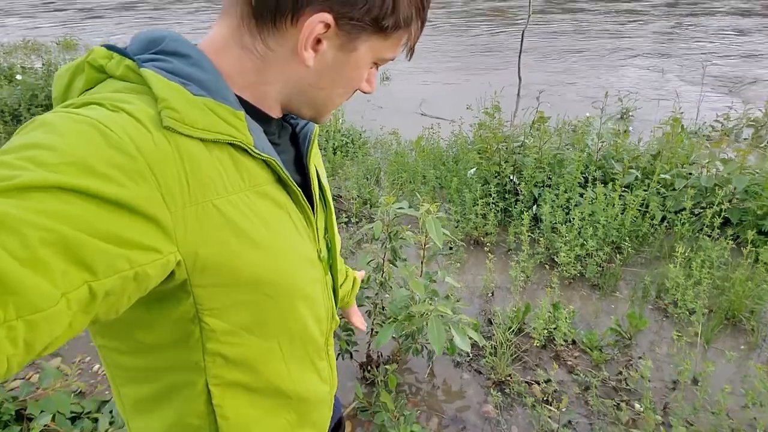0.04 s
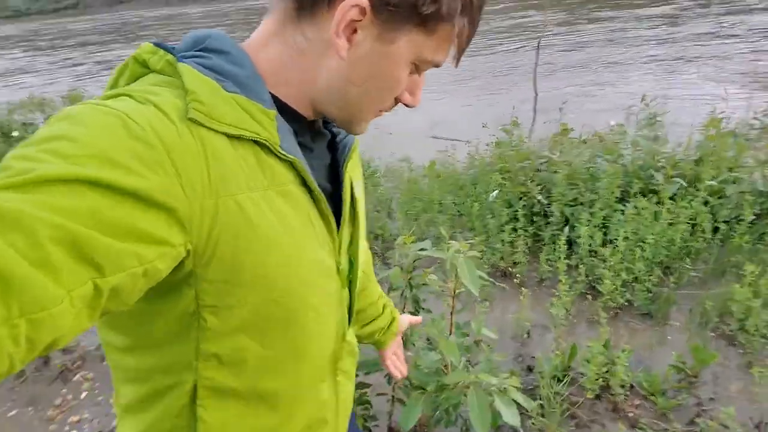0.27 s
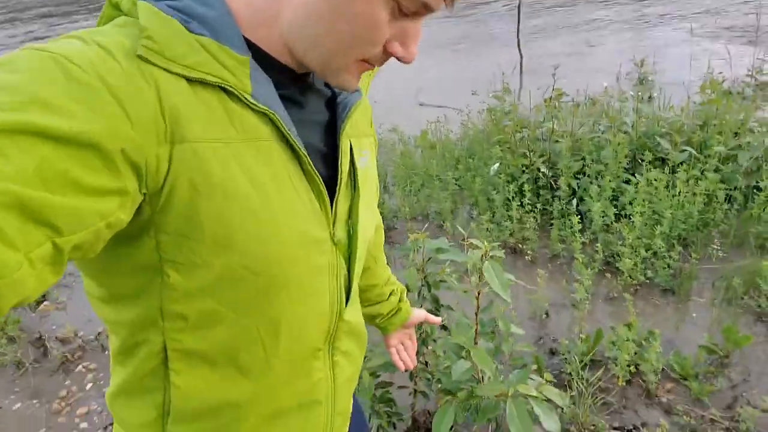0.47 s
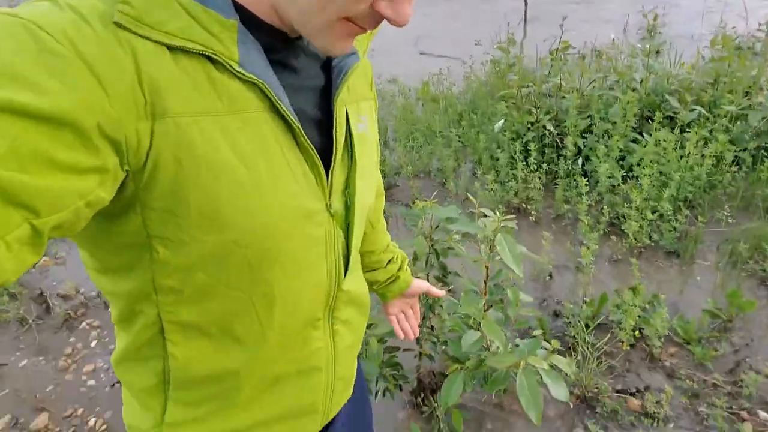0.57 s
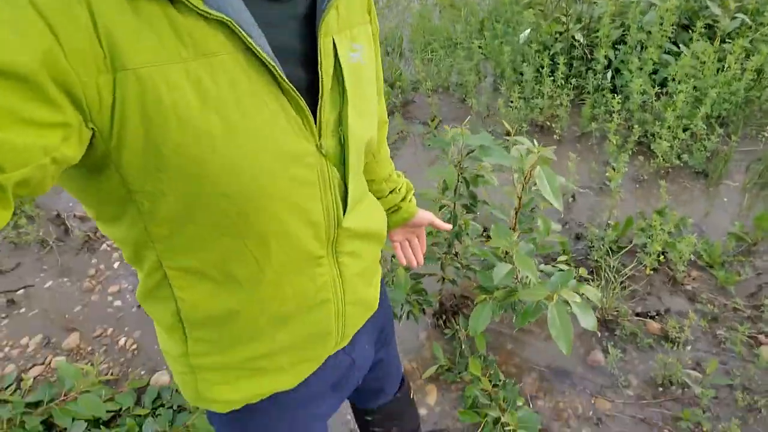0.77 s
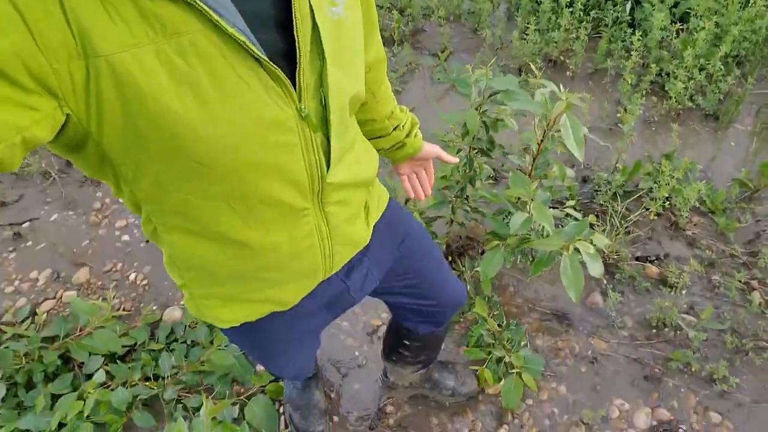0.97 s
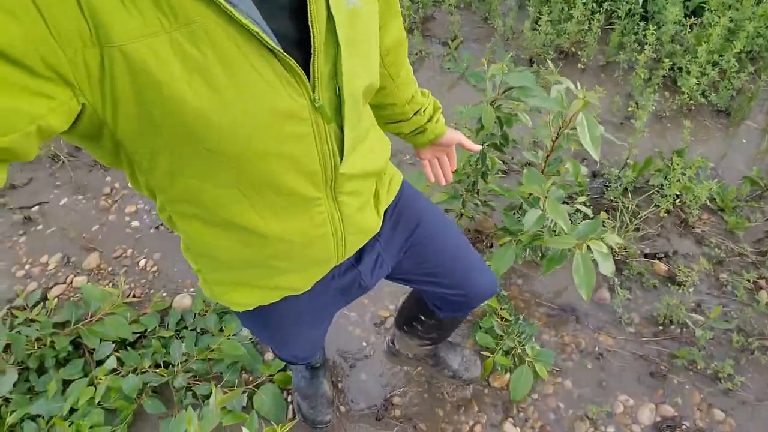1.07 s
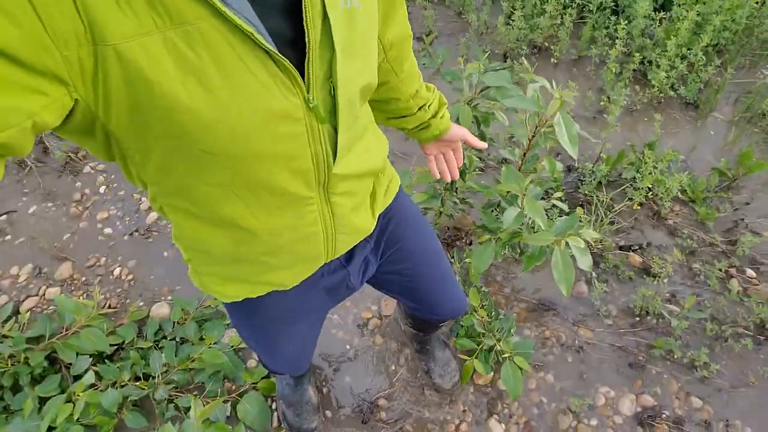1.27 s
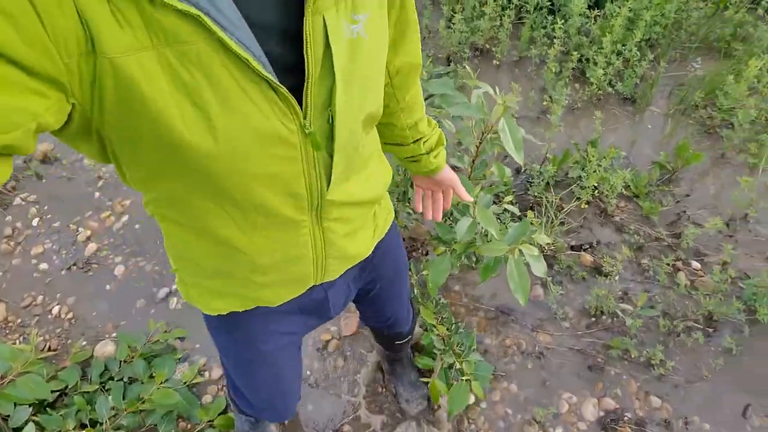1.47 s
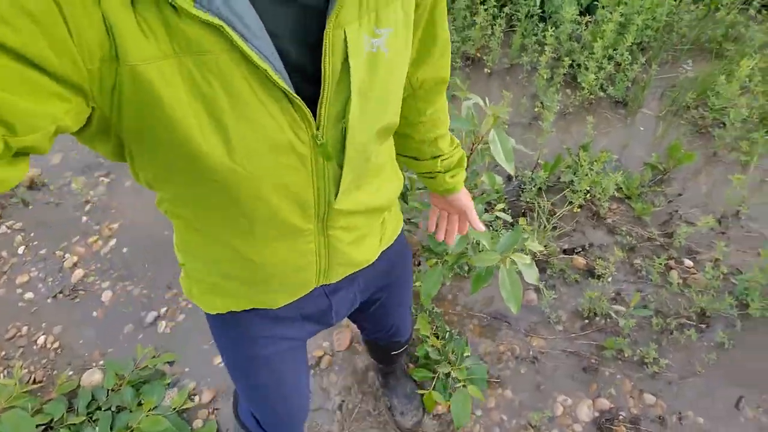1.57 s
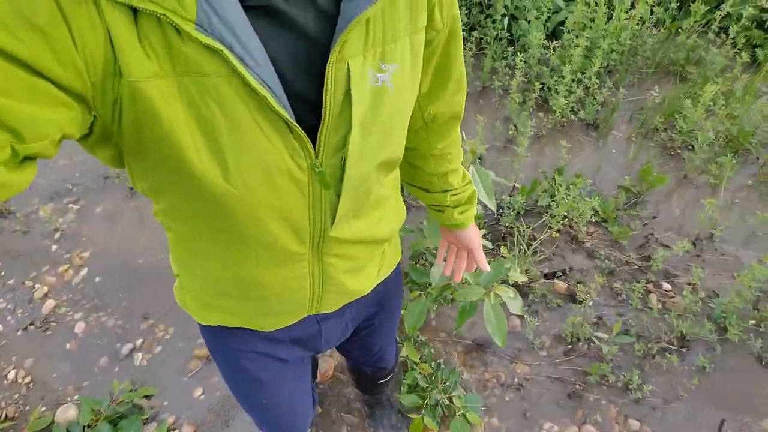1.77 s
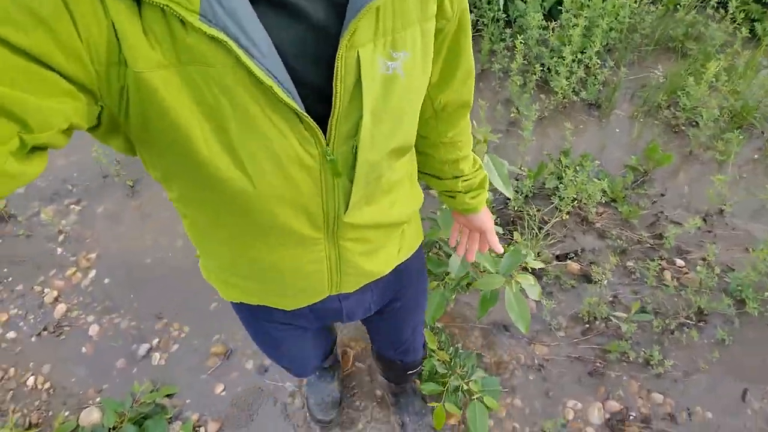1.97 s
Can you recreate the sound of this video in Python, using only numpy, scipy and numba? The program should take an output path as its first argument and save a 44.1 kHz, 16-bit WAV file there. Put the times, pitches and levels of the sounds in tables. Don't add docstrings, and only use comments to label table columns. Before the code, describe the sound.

Rubber boots squelch through wet riverbank mud, with sucking pops, bubbles and low wind rumble

```python
import sys
import numpy as np
from scipy import signal
from scipy.fft import rfft, irfft, next_fast_len
from scipy.io import wavfile
from scipy.ndimage import uniform_filter1d
from numba import njit

SR = 44100
rng = np.random.default_rng(int(sys.argv[2]) if len(sys.argv) > 2 else 0)


def voltage_ratio(decibels):
    exponent = np.asarray(decibels, float) / 20
    return 10 ** exponent


def dump(signal):
    limited = np.clip(np.atleast_2d(signal).T, -1, 1)
    pcm = np.round(limited * 32767).astype(np.int16)
    wavfile.write(sys.argv[1], SR, pcm)


N = 89655
T = np.arange(N) / SR
FFT_SIZE = next_fast_len(N)
HZ = np.fft.rfftfreq(FFT_SIZE, 1 / SR)


def unit(x):
    return x / np.sqrt(np.mean(x ** 2))


def gain_at(table, hz):
    f, db = np.array(table, float).T
    return voltage_ratio(np.interp(np.log(hz + 1), np.log(f), db, left=-70, right=-70))


def noise(table):
    spectrum = rfft(rng.standard_normal(N), FFT_SIZE) * gain_at(table, HZ)
    return unit(irfft(spectrum, FFT_SIZE)[:N])


def walk(rate_hz):
    k = int(SR / rate_hz)
    steps = np.repeat(rng.standard_normal(N // k + 1), k)
    return unit(uniform_filter1d(uniform_filter1d(steps, k), k)[:N])


@njit
def rings(n, start, turn, t60, glide, size, swell):
    y = np.zeros(n)
    for k in range(len(start)):
        first = int(start[k]) + 1
        last = min(n, first + int(.7 * t60[k]) + 1)
        fall = np.exp(-np.log(1000.) / t60[k])
        bend = np.exp(1j * turn[k] * glide[k])
        z = size[k] * np.exp(1j * turn[k] * (first - start[k]))
        step = fall * np.exp(1j * turn[k])
        rest = 1.
        keep = np.exp(-turn[k] / (6.3 * swell))
        for i in range(first, last):
            rest *= keep
            y[i] += z.imag * (1 - rest)
            z *= step
            step *= bend
    return y


def ring(s, hz, t60, glide, size, swell):
    turn = 2 * np.pi * np.minimum(hz, .4 * SR) / SR
    return rings(N, s * SR, turn, t60 * SR, glide / SR + 0 * s, size, swell)


def cluster(s, db, hz, late_s, spread, count):
    u = rng.standard_normal((len(s), count, 2))
    u[:, 0] = 0
    u[:, 1:, 1] = .3 * u[:, 1:, 1] + np.array([-1, 1, .5])
    times = s[:, None] + late_s * np.abs(u[..., 0])
    pitches = hz[:, None] * np.exp(spread * np.tanh(u[..., 1]))
    sizes = np.repeat(voltage_ratio(db), count) * np.tile(0.75 ** np.arange(count), len(s))
    return times.ravel(), pitches.ravel(), sizes


def surge(s, rise_s, fall_s):
    age = np.maximum(T - s, 0)
    return np.minimum(age / rise_s, 1) * voltage_ratio(-60 * np.maximum(age - rise_s, 0) / fall_s)


def pockets(table, count, cycles=9.1):
    when, where, strength, kind = rng.random((count, 4)).T
    lo, hi = np.sqrt(table[0][0]), np.sqrt(table[-1][0])
    hz = (lo + (hi - lo) * where) ** 2
    size = gain_at(table, hz) * hz ** 0.58
    size = size * voltage_ratio(-4.5 * np.log(1.02 - strength)) * np.sign(kind - .5)
    t60 = cycles * (.5 + 2 * np.abs(kind - .5)) / hz
    swarm = ring(when * N / SR, hz, t60, hz / 100, size, swell=0.49)
    return unit(swarm) + voltage_ratio(-8) * noise(table)


def ports(left, right):
    # f/Hz, left over right level/dB, left leads by phase/rad
    port_table = [(300, -1, 0), (1420, -5, 0.27), (1910, -9.5, 1.08), (3730, -6.5, 1.45), (4250, 0.5, 5),
                  (5300, 0, 7), (5830, 5.5, 6.5), (8670, 10.5, 11.5), (13200, 2.5, 10.5)]
    f, db, lead = np.array(port_table, float).T
    half = voltage_ratio(np.interp(HZ, f, db) / 2) * np.exp(.5j * np.interp(HZ, f, lead))
    left_out = irfft(rfft(left, FFT_SIZE) * half, FFT_SIZE)[:N]
    right_out = irfft(rfft(right, FFT_SIZE) / half, FFT_SIZE)[:N]
    return np.array([left_out, right_out])


def river():
    # f/Hz, level/dB per Hz
    hiss = [(100, -26), (200, -3.5), (640, -4.5), (1400, -7), (3400, -7.5), (4500, -19), (7340, -27.5),
            (16000, -28.5)]
    mid, left, right = (noise(hiss) for _ in range(3))
    return voltage_ratio(-68 + walk(5.4)) * ports(mid + left, mid + right)


def whistle(s, length, hz_of, db, wobble):
    u = np.clip((T - s) / length, 0, 1)
    on = np.flatnonzero((u > 0) & (u < 1))
    u = u[on]
    part = on - rng.integers(N)
    pitch = hz_of(u) * (1 + .015 * wobble[0][part])
    level = voltage_ratio(db + 14 * (u - .7) + 2.5 * wobble[1][part])
    out = np.zeros(N)
    out[on] = level * np.sin(np.pi * u ** 1.6) ** .5 * np.sin(2 * np.pi * np.cumsum(pitch) / SR)
    return out


def birds():
    # t/s, length/s, start f/Hz, end f/Hz, level/dB
    slides = [(-.25, .38, 2060, 2060, -65), (-.25, .38, 3900, 4150, -71), (.4, .22, 3450, 3000, -68),
              (1.0, .09, 7750, 5800, -58), (1.19, .145, 8900, 5500, -58), (1.225, .1, 7000, 5700, -71),
              (1.505, .06, 7400, 5500, -53), (1.31, .03, 5900, 5000, -62), (1.7, .04, 6000, 6600, -59),
              (1.735, .045, 2400, 2400, -63), (.77, .04, 2950, 3050, -68), (.42, .13, 3550, 3500, -71),
              (.59, .04, 2700, 2650, -69)]
    # t/s, length/s, base f/Hz, rise/Hz, level/dB
    arch = (.053, .066, 6150, 900, -61)
    wobble = walk(450), walk(83)
    out = np.zeros(N)
    for s, length, start, end, db in slides:
        out += whistle(s, length, lambda u: start + (end - start) * u ** 1.4, db, wobble)
    s, length, base, rise, db = arch
    out += whistle(s, length, lambda u: base + rise * np.sin(np.pi * u), db, wobble)
    pan_db = -9
    return np.array([voltage_ratio(pan_db / 2) * out, voltage_ratio(-pan_db / 2) * np.roll(out, 3)])


def buffet(rumble, gust_db):
    power = uniform_filter1d(rumble ** 2, int(0.0444 * SR))
    return rumble / np.sqrt(power + 0.12) * voltage_ratio(gust_db + walk(26))


def wind():
    # t/s, level/dB
    gusts = [(.04, -45), (.085, -31), (.19, -31), (.24, -38), (.31, -32), (.42, -58), (.6, -67), (.79, -64),
             (.86, -49), (1.06, -63), (1.2, -67), (1.32, -52), (1.37, -56), (1.44, -38), (1.5, -48),
             (1.62, -29), (1.74, -41), (1.89, -39), (1.95, -50), (2.01, -37)]
    # f/Hz, level/dB per Hz
    rumble = [(20, -13), (40, -13), (62, -3.5), (77, 1.5), (100, -6.5), (140, -15), (220, -26), (400, -46)]
    gust_db = np.interp(T, *np.array(gusts).T)
    right = buffet(noise(rumble), gust_db)
    left = voltage_ratio(-19) * buffet(noise(rumble), gust_db)
    return 2.39 * np.array([left, right])


def squeeze():
    # t/s, rise/s, fall t60/s, mud level/dB, spray level/dB
    squeezes = [(0.115, 0.016, 0.085, -45, -42.5), (0.13, 0.0082, 0.1, -35, -48),
                (0.159, 0.028, 0.38, -44, -53.5), (0.223, 0.096, 0.6, -55, -59),
                (.44, 0.038, 0.62, -68, -74.5), (0.584, 0.051, 0.45, -61.5, -97),
                (0.804, 0.012, 0.67, -44.5, -60.5), (0.843, 0.05, 0.43, -39.5, -54),
                (0.974, 0.0016, 0.03, -45, -48.5), (1.033, 0.016, 0.3, -53, -67),
                (1.24, 0.066, 1.8, -60, -69.5), (1.389, 0.0038, 0.079, -35, -32),
                (1.409, .002, 0.11, -37, -48), (1.42, 0.0048, 0.075, -36, -34.5),
                (1.447, 0.0053, 0.41, -45.5, -56.5), (1.519, 0.022, 1, -52, -56.5),
                (1.587, 0.0091, 0.26, -43, -52.5), (1.661, 0.031, 0.046, -75, -57),
                (1.88, 0.008, 0.18, -42.5, -48.5), (1.917, 0.0055, 0.58, -46, -65.5),
                (1.999, 0.0061, 0.48, -52, -89)]
    power = np.zeros((2, N))
    for s, rise, fall, mud_db, spray_db in squeezes:
        power += (voltage_ratio([[mud_db], [spray_db]]) * surge(s, rise, fall)) ** 2
    return np.sqrt(power)


def squelch():
    # f/Hz, level/dB per Hz
    mud_curve = [(100, 4.5), (160, -9), (400, -9.5), (850, -8.5), (2000, -10), (3500, -11), (4500, -41),
                 (7000, -28)]
    # f/Hz, level/dB per Hz
    spray_curve = [(2000, -13), (3500, 0.5), (6150, -7.5), (9500, -14.5), (13200, -8), (15500, -2),
                   (16400, -47)]
    mud_gain, spray_gain = squeeze()
    mud, mud_left, mud_right = (pockets(mud_curve, count=n) * mud_gain for n in (7000, 3000, 3000))
    spray, spray_left, spray_right = (pockets(spray_curve, count=12000) * spray_gain for _ in range(3))
    apart = 1.34 * np.array([spray_left, spray_right])
    edge = signal.butter(1, 1500, "high", fs=SR)
    apart += 0.85 * signal.lfilter(*edge, np.array([mud_left, mud_right]))
    return mud + spray + apart


def snaps():
    # t/s, peak level/dB, centre f/Hz, left over right level/dB
    snap_events = [(.118, -33, 2500, 0), (.2, -34, 4000, 0), (.2533, -24, 7000, 18), (.2533, -33, 3400, 0),
                   (.336, -33, 9000, -1.5), (.595, -52, 1200, 0), (.603, -58, 5260, 12),
                   (.639, -46, 600, 0), (.845, -36, 1500, 0), (.9735, -28, 2000, 0), (.9735, -28, 5500, 3),
                   (1.054, -31, 1700, -6), (1.3932, -16, 1120, 1), (1.3935, -9, 4200, -3),
                   (1.4215, -18, 3240, .5), (1.567, -34, 11000, 4), (1.608, -20, 2200, -3.5),
                   (1.6878, -34, 2000, -6), (1.867, -46, 1200, 0), (1.889, -26, 1750, -3),
                   (1.904, -34, 2000, 0), (1.955, -29, 900, 0)]
    s, db, hz, pan_db = np.array(snap_events).T
    s, hz, size = cluster(s, db, hz, late_s=0.000655, spread=0.68, count=4)
    half_pan_db = np.repeat(pan_db, 4) / 2
    left, right = (ring(s, hz, 7.66 / hz, 0., size * voltage_ratio(side * half_pan_db), swell=0.28) for side in (1, -1))
    return np.array([left, right])


def sloshes():
    # t/s, rise/s, fall t60/s, level/dB
    slosh_events = [
        (.13, .01, 0.16, -41.5),
        (.158, 0.0078, 0.38, -41),
        (.195, 0.0083, 0.17, -42.5),
        (.545, .03, 0.83, -61),
        (.635, 0.0067, 0.54, -56),
        (.665, .01, 0.35, -62),
        (1.391, 0.0044, 0.1, -42.5),
        (1.552, 0.042, 0.14, -51),
        (1.882, 0.0031, 0.21, -41.5),
    ]
    # f/Hz, level/dB per Hz
    gurgle = [(120, -8), (180, 1), (350, -2.5), (700, -8.5), (1000, -26)]
    power = np.zeros(N)
    for s, rise, fall, db in slosh_events:
        power += (voltage_ratio(db) * surge(s, rise, fall)) ** 2
    return pockets(gurgle, count=900, cycles=3.9) * np.sqrt(power)


def risers():
    # t/s, peak level/dB, f/Hz, t60/s, relative pitch glide per s
    riser_events = [(.138, -33, 3250, .016, 0), (.14, -30, 1470, .03, 4), (.745, -58, 2700, .08, 0),
                    (.813, -37, 1000, .018, 0), (.8135, -30, 1900, .035, 2), (.879, -35, 2200, .01, 0),
                    (.9005, -33, 1000, .014, 0), (.903, -34, 800, .014, 0), (.9115, -34, 700, .012, 0),
                    (.921, -33, 1900, .01, 0), (.933, -37, 950, .025, 0), (.955, -37, 1000, .02, 0),
                    (1.528, -40, 3000, .012, 0), (1.584, -39, 3350, .02, 0), (1.6015, -28, 2300, .014, 0),
                    (1.6078, -23, 830, .042, 24), (1.611, -37, 3200, .02, 0), (1.6155, -31, 1750, .016, 5),
                    (1.618, -38, 1500, .04, 14), (1.64, -39, 2200, .025, 0), (1.667, -43, 1520, .06, 6),
                    (1.6735, -32, 3100, .025, 70), (1.6875, -30, 1600, .016, 3),
                    (1.9262, -31, 1300, .014, 5), (1.931, -32, 1300, .016, 5), (1.932, -39, 3350, .016, 0),
                    (1.936, -31, 1350, .018, 5), (1.9445, -34, 1250, .012, 0), (1.9475, -34, 1250, .01, 0),
                    (1.9615, -31, 1300, .012, 3), (2.013, -40, 1180, .016, 0)]
    s, db, hz, t60, glide = np.array(riser_events).T
    return ring(s, hz, t60, glide, voltage_ratio(db), swell=0.75)


def thuds():
    # t/s, peak level/dB, f/Hz
    thud_events = [(.825, -24, 240), (0.847, -25.5, 185), (1.3908, -17.5, 397), (1.3927, -19.5, 670),
                   (1.396, -15, 179), (0.138, -24, 370), (1.886, -27.5, 198), (1.925, -26.5, 494),
                   (.162, -20.5, 169), (.857, -29, 160), (1.979, -31, 200)]
    s, db, hz = np.array(thud_events).T
    return ring(s, hz, 2.5 / hz, 0., -voltage_ratio(db), swell=0.075)


def bubbles():
    # t/s, peak level/dB, f/Hz, t60/s
    bubble_events = [(.16, -31, 824, 0.044), (.179, -31.5, 830, 0.038), (.194, -30.5, 797, 0.056),
                     (0.319, -34.5, 2420, 0.013), (0.35, -41, 2910, 0.018), (.36, -39, 2020, 0.019),
                     (0.368, -42, 1380, 0.012), (1.034, -42, 1034, 0.011), (1.399, -21.5, 2400, 0.0057),
                     (1.403, -17, 2580, 0.008), (1.411, -26, 1800, 0.013), (1.426, -25.5, 2150, 0.024),
                     (1.531, -39, 2540, 0.013), (1.556, -33.5, 2520, 0.019), (1.46, -32, 1750, 0.0085),
                     (1.474, -33, 1690, 0.015), (1.78, -41, 1540, 0.0059)]
    s, db, hz, t60 = np.array(bubble_events).T
    s, hz, size = cluster(s, db, hz, late_s=0.0028, spread=0.091, count=4)
    return ring(s, hz, np.repeat(t60, 4), 3.5, size, swell=1.44)


def boots():
    shared = sloshes() + risers() + thuds() + bubbles()
    return ports(*(squelch() + snaps() + shared))


def scene():
    return river() + birds() + wind() + boots()


def roll_off(x):
    return signal.sosfilt(signal.butter(12, 16590, fs=SR, output="sos"), x)


def record(dry):
    low_pass = signal.ellip(10, 1, 45, 15800, fs=SR, output="sos")
    return roll_off(signal.sosfilt(low_pass, dry))


dry = scene()
out = record(dry)
dump(out)
```